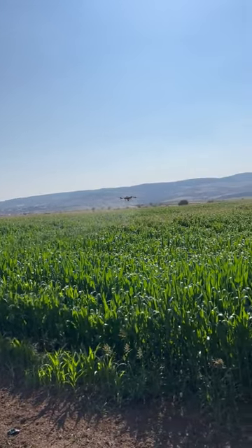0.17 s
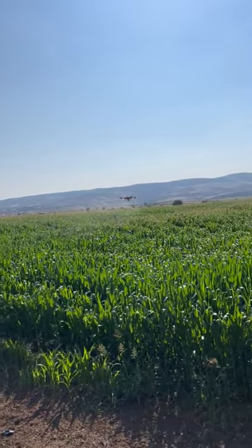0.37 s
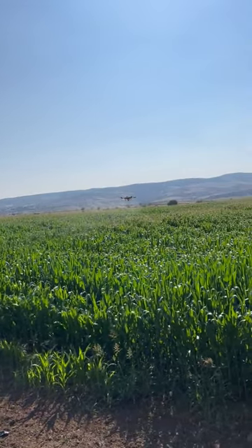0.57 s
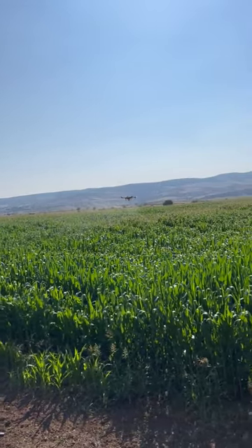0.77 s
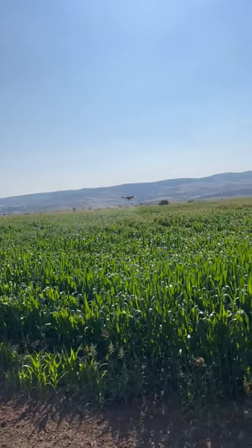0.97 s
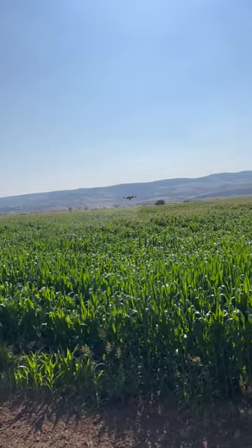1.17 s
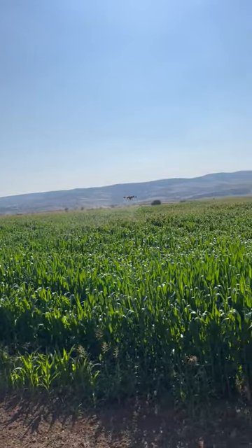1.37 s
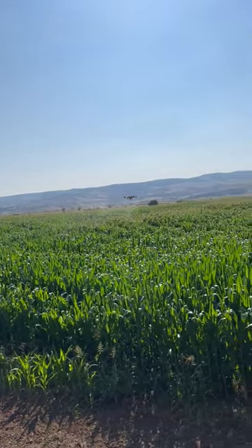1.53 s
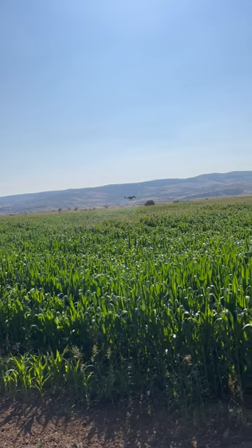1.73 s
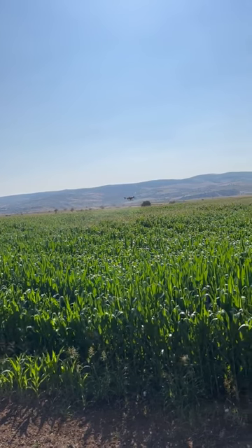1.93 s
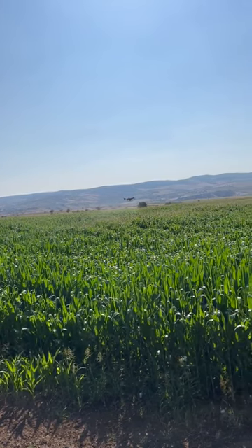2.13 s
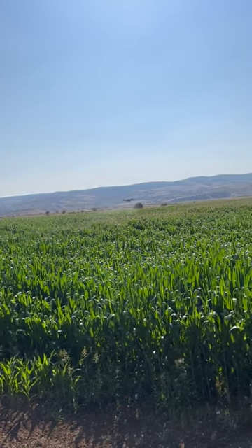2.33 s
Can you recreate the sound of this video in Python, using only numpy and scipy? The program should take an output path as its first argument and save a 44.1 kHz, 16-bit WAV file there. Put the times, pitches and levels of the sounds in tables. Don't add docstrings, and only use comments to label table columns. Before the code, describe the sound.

A large sprayer drone flies away low over a maize field, droning while wind buffets the microphone.

```python
import sys
import numpy as np
from scipy import signal
from scipy.fft import rfft, irfft
from scipy.io import wavfile
from scipy.ndimage import uniform_filter1d

SR = 44100
rng = np.random.default_rng(int(sys.argv[2]) if len(sys.argv) > 2 else 0)


def dump(signal):
    limited = np.clip(np.atleast_2d(signal).T, -1, 1)
    pcm = np.round(limited * 32767).astype(np.int16)
    wavfile.write(sys.argv[1], SR, pcm)


def linear_from_db(decibels):
    return 10 ** (np.asarray(decibels, float) / 20)


N = 105840

# centre_s, width_s, level_db
INSECT_SPELLS = [
    (.1, 0.17, -70.5),
    (1.35, 0.15, -69.5),
]
# start_s, length_s, level_db
LEAF_BRUSHES = [
    (.0, .06, -72),
    (.2, .07, -69),
    (.33, .5, -67),
    (.81, .125, -60),
    (1., .07, -67),
    (1.2, .34, -67),
    (1.5, .25, -69.5),
    (1.84, .085, -59),
]
# pitch_hz, level_db (per Hz)
LEAF_COLOUR = [(500, -30), (1000, -8), (2000, -4), (4500, -1), (8000, -3), (12500, -6), (15000, -15)]
HUM_HZ = [665, 1328, 8908]
# level_db, left_over_right_db, left_lead_rad, waver_hz
HUM_TONES = [
    (-66, 4., -.8, 2.),
    (-62.8, 5., -1.2, 1.8),
    (-86, 0., -.7, 1.5),
]
# time_s, speed_share above rest
GENERATOR_LOAD = [(0, 0), (1.38, 0), (1.48, .007), (1.7, .005), (1.9, .001), (2.4, 0)]
# centre_s, width_s, peak_db, slosh_hz
BUFFETS = [(0.036, 0.061, -53, 59), (0.178, 0.015, -41, 51.4), (0.223, 0.0095, -32.5, 101),
           (.25, 0.0062, -37.5, 60), (0.294, 0.011, -27.5, 69.6), (0.348, 0.016, -21.5, 64.3),
           (0.372, 0.021, -29.5, 71), (.42, 0.013, -24.5, 67), (0.46, 0.023, -29, 73),
           (0.496, 0.015, -30, 101), (0.521, 0.0049, -25, 60.4), (0.563, 0.013, -30, 65.6),
           (0.602, 0.03, -27, 66.6), (0.664, 0.018, -32, 73.4), (0.709, 0.0092, -33.5, 109.4),
           (0.754, 0.017, -39.5, 98.4), (.815, 0.025, -47, 76), (1.049, 0.043, -62.5, 61),
           (1.201, 0.021, -54, 73), (1.436, 0.015, -53.5, 72.4), (1.608, 0.018, -50, 57),
           (1.803, 0.084, -62.5, 67), (2.25, 0.026, -56, 47), (2.328, 0.07, -63, 89)]
# pitch_hz, level_db (per Hz)
BUFFET_COLOUR = [(12, -60), (20, -0.5), (51, -0.5), (70, -4), (97, -3.5), (156, -13.5), (232, -23),
                 (264, -52), (330, -32.5), (430, -87), (730, -120)]
# pitch_hz, level_db (per Hz)
HISS_COLOUR = [(40, -18.5), (300, -4.5), (480, -1.5), (800, -3), (1500, -9.5), (5500, -18), (12800, -35),
               (15000, -38)]
# time_s, blade_pass_hz
ROTOR_SPEED = [(0, 65.2), (.4, 66.2), (.7, 65.8), (.88, 64.4), (1.1, 65.3), (1.6, 65), (1.9, 64),
               (2.4, 64.2)]
# time_s, level_db, tilt_db (per octave)
FLIGHT = [(0.0, -42, -7), (0.13, -42, -3), (0.3, -42, 4), (0.55, -42.5, 1.5), (0.75, -44, -4),
          (0.88, -46, 1), (1.1, -43, 1), (1.35, -48, -2.5), (1.7, -47, -2), (1.9, -45.5, 2.5),
          (2.02, -48, 6), (2.14, -49.5, -5), (2.4, -48, 2)]
# multiple of the blade rate, level_db
SLAP_HARMONICS = [(1, -11), (2, -6.5), (3, -1.5), (4, 0.5), (5, -5), (6, 2), (7, 5), (8, 3), (9, -26),
                  (10, -12), (11, -2.5), (12, -4)]
PORT_COMB = [(0, 0, .96), (.03, .35, .95), (.075, 1.5, .85), (.092, 1.2, .3), (.113, 2.1, .72),
             (.14, 1.4, .33), (.2, 0, .4), (.245, -.15, .9), (.275, -.8, .5), (.315, -2.8, .74),
             (.37, -2, .6), (.57, -.3, .55), (.67, -1.4, .4), (.72, -3.14, .95), (.845, -3.14, .95),
             (.9, -4.6, .4), (.99, -6.28, .9), (1, -6.28, .96)]
# pitch_hz, left_over_right_db
LEFT_LEAN = [(500, 0.5), (800, -3), (980, -9), (1500, -0.5), (2200, -3), (3200, -6), (4200, -2),
             (5500, -0.5)]
# start_s, length_s
TOP_OPEN = [(0, .04), (.21, .06), (.55, .09), (1.03, .04), (1.14, .12), (1.38, .06), (1.66, .03),
            (1.89, .04)]
TOP_BAND_HZ = 15150


def evened(x):
    return x / np.sqrt(np.mean(x ** 2) + 1e-20)


def read(points, hz):
    f, value = np.transpose(points)
    return np.interp(np.log(hz + 1), np.log(f + 1), value)


def coloured(x, gain):
    return irfft(rfft(x) * gain(np.fft.rfftfreq(N, 1 / SR)), N)


def drift(top_hz, size):
    noise = rng.standard_normal((*size, N))
    return evened(coloured(noise, lambda hz: (hz > 0) / (1 + (hz / top_hz) ** 4)))


def smoothed(x, bands, frames):
    return evened(uniform_filter1d(uniform_filter1d(x, bands, axis=0), frames, axis=1))


def bumps(rows):
    t = np.arange(N) / SR
    power = sum((linear_from_db(db) * np.exp(-.5 * ((t - s) / w) ** 2)) ** 2 for s, w, db, *_ in rows)
    return np.sqrt(power)


def insects():
    centre_hz, width_hz = 7900, 350
    band = lambda f: np.exp(-((f - centre_hz) / width_hz) ** 2)
    return bumps(INSECT_SPELLS) * evened(coloured(rng.standard_normal((2, N)), band))


def leaves():
    rise_s, fall_s, crackle_db, crackle_hz = .025, .035, 2., 150
    t = np.arange(N) / SR
    shape = 0
    for start, length, db in LEAF_BRUSHES:
        rise = np.clip((t - start) / rise_s, 0, 1)
        fall = np.clip((start + length - t) / fall_s, 0, 1)
        shape = shape + linear_from_db(db) * rise * fall
    grain = linear_from_db(crackle_db * drift(crackle_hz, size=(1,)))
    noise = grain * rng.standard_normal((2, N))
    return shape * evened(coloured(noise, lambda f: linear_from_db(read(LEAF_COLOUR, f))))


def generator():
    sway_db, sway_hz = 2.2, 15
    out, side = np.zeros((2, N)), np.array([[.5], [-.5]])
    load = np.interp(np.arange(N) / SR, *np.transpose(GENERATOR_LOAD))
    for hz, (db, pan_db, lead, waver_hz) in zip(HUM_HZ, HUM_TONES):
        pitch, size = drift(sway_hz, size=(2,))
        tone_hz = hz * (1 + load * (hz < SR / 10)) + waver_hz * pitch
        turn = 2 * np.pi * np.cumsum(tone_hz) / SR
        level = linear_from_db(db + pan_db * side + sway_db * size)
        out += np.sqrt(2) * level * np.sin(turn + lead * side)
    return out


def wind():
    alike, steadiness, breeze_db, slosh_share = .97, 0.57, -64, 0.76
    lead_rad, lead_hz, lead_power, lead_max_rad = .21, 65, 1.35, .75
    low_cut_hz = 37
    a, b = rng.standard_normal((2, N))
    pair = np.array([a, alike * a + np.sqrt(1 - alike ** 2) * b])
    rumble = coloured(pair, lambda f: linear_from_db(read(BUFFET_COLOUR, f)))
    size = abs(signal.hilbert(evened(rumble).mean(axis=0)))
    rumble = evened(rumble / (uniform_filter1d(size, 500) + 0.24) ** steadiness)
    t = np.arange(N) / SR
    slosh = 0
    for row, start in zip(BUFFETS, rng.random(len(BUFFETS))):
        centre, slosh_hz = row[0], row[3]
        slosh = slosh + bumps([row]) * np.cos(2 * np.pi * (slosh_hz * (t - centre) + start))
    gust = np.sqrt(1 - slosh_share ** 2) * bumps(BUFFETS) + linear_from_db(breeze_db)
    x = np.sqrt(2 * slosh_share) * slosh + rumble * gust
    side = np.array([[-.5], [.5]])
    lead = lambda f: np.minimum(lead_rad * (f / lead_hz) ** lead_power, lead_max_rad) * side
    return coloured(x, lambda f: np.exp(1j * lead(f)) / (1 + (low_cut_hz / (f + 1)) ** 6))


def blade_hiss():
    hiss_db, patch_db, wide_db, swell_db, streak_db = -50, -0.21, .6, .4, 2
    dip_hz, dip_depth, dip_width_hz = 910, .4, 70
    frames = N // 128 + 5
    a, b, c, d, patch, wide, streak = rng.standard_normal((frames, 257, 7)).T
    streak = smoothed(streak, 2, 90)
    patch = smoothed(patch, 6, 24)
    wide = smoothed(wide, 120, 8)
    swell = smoothed(wide, 60, 60)
    flicker = linear_from_db(patch_db * patch + wide_db * wide + swell_db * swell + streak_db * streak)
    z = np.array([a + 1j * b, c + 1j * d]) * flicker
    x = signal.istft(z, nperseg=512, noverlap=384)[1][:, :N]
    dip = lambda f: 1 - dip_depth * np.exp(-((f - dip_hz) / dip_width_hz) ** 2)
    return linear_from_db(hiss_db) * evened(coloured(x, lambda f: linear_from_db(read(HISS_COLOUR, f)) * dip(f)))


def sprayer():
    slap_db, hiss_follows, chop_depth = -6.5, 0.31, 0.23
    speed_spread, speed_wander, wander_hz = .009, .006, 4.65
    flutter_db, flutter_hz, scatter_db, scatter_hz = 2., 10, 1.5, 6
    t = np.arange(N) / SR
    s, level_db, tilt_db = np.transpose(FLIGHT)
    level_db, tilt_db = np.interp(t, s, level_db), np.interp(t, s, tilt_db)
    hz = np.interp(t, *np.transpose(ROTOR_SPEED))
    off = speed_spread * np.linspace(-1, 1, num=4)[:, None] + speed_wander * drift(wander_hz, size=(2, 4))
    turn = 2 * np.pi * (np.cumsum(hz * (1 + off), axis=-1) / SR + rng.random((2, 4, 1)))
    loud = linear_from_db(flutter_db * drift(flutter_hz, size=(2, 4)))
    slaps = 0
    for k, db in SLAP_HARMONICS:
        level = linear_from_db(db + tilt_db * np.log2(k / 6) + scatter_db * drift(scatter_hz, size=(1,)))
        slaps = slaps + level * (loud * np.cos(k * turn)).sum(axis=1)
    chop = 1 + chop_depth * (loud * np.cos(turn)).mean(axis=1)[:1]
    hiss_level = linear_from_db(hiss_follows * (level_db - level_db.mean()))
    return linear_from_db(level_db + slap_db) * evened(slaps) + hiss_level * chop * blade_hiss()


def ports(pair):
    comb_hz, comb_sway, comb_ripple, likeness_ripple = 7600, .004, .012, .1
    sway_hz, top_band_db = 0.67, -6
    hz, _, (a, b) = signal.stft(pair, SR, nperseg=1024, noverlap=768)
    share, lead, same = np.transpose(PORT_COMB)
    ripple = smoothed(rng.standard_normal(a.T.shape).T, 8, 30)
    frame_at = np.minimum(np.arange(a.shape[1]) * 256, N - 1)
    sway = drift(sway_hz, size=(1,))[0, frame_at]
    column = hz[:, None]
    at = (column / comb_hz * (1 + comb_sway * sway) + comb_ripple * ripple * (column > 1500)) % 1
    same = np.interp(at, share, same)
    same = np.clip(same + likeness_ripple * ripple[::-1] * (1 - same ** 2) * 2, 0, 1)
    right = same * np.exp(1j * np.interp(at, share, lead)) * a + np.sqrt(1 - same ** 2) * b
    lean = linear_from_db(read(LEFT_LEAN, hz) / 2)[:, None]
    shelf = linear_from_db(top_band_db * (column > TOP_BAND_HZ))
    z = np.array([a * lean, right / lean]) * shelf
    return signal.istft(z, SR, nperseg=1024, noverlap=768)[1][:, :N]


def scene():
    field = insects() + leaves() + sprayer()
    return ports(field) + generator() + wind()


def low_pass(x):
    return signal.sosfilt(signal.butter(12, 16430, fs=SR, output="sos"), x)


def record(dry):
    mask_db, hole_db, mask_from_hz = 8, 4.2, 1700
    mid_top_hz, side_top_hz = 15730, 14500
    mid_side = np.array([dry[0] + dry[1], dry[0] - dry[1]]) / 2
    hz, t, z = signal.stft(mid_side, SR, nperseg=2048)
    column = hz[:, None]
    power = uniform_filter1d(uniform_filter1d(abs(z) ** 2, size=4, axis=1), size=3, axis=2)
    around = uniform_filter1d(power, size=20, axis=2)
    low = column < mask_from_hz
    keep = (power * linear_from_db(2 * mask_db) > power[::-1]) | low
    keep &= (power * linear_from_db(2 * hole_db) > around) | low
    keep &= column < np.array([mid_top_hz, side_top_hz])[:, None, None]
    is_open = np.any([(t >= s) & (t <= s + d) for s, d in TOP_OPEN], axis=0)
    keep &= (column < TOP_BAND_HZ) | is_open
    mid, side = signal.istft(z * keep, SR, nperseg=2048)[1][:, :N]
    return low_pass(np.array([mid + side, mid - side]))


dry = scene()
out = record(dry)
dump(out)
```